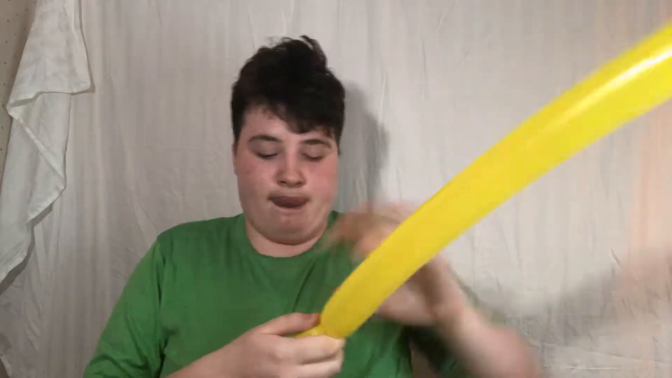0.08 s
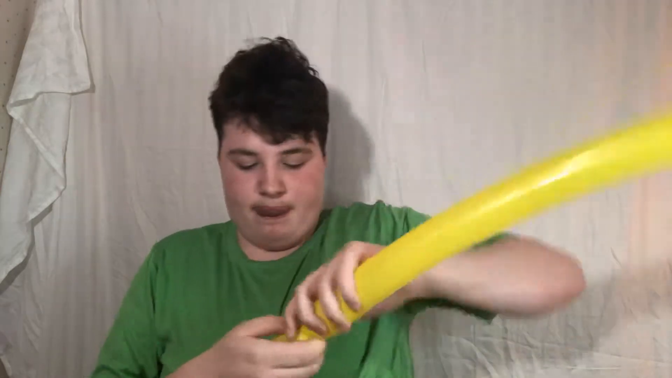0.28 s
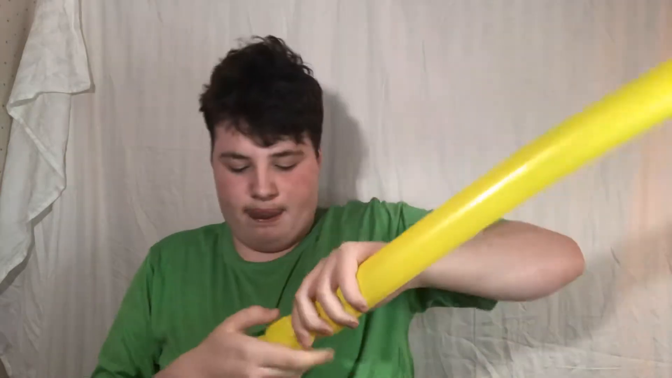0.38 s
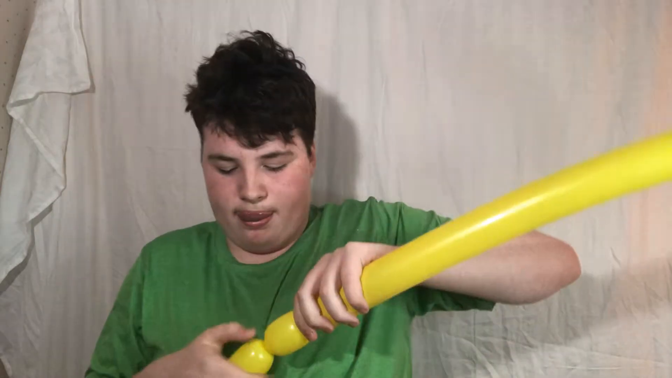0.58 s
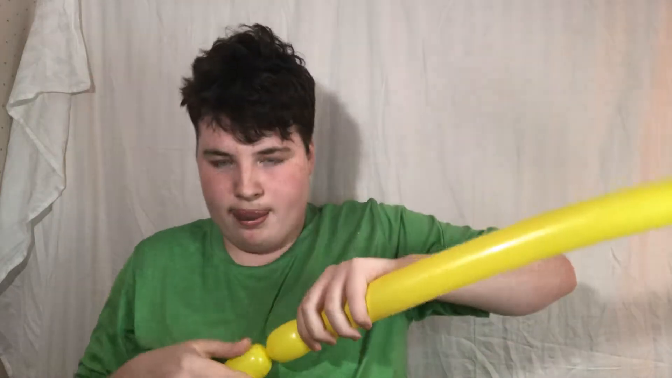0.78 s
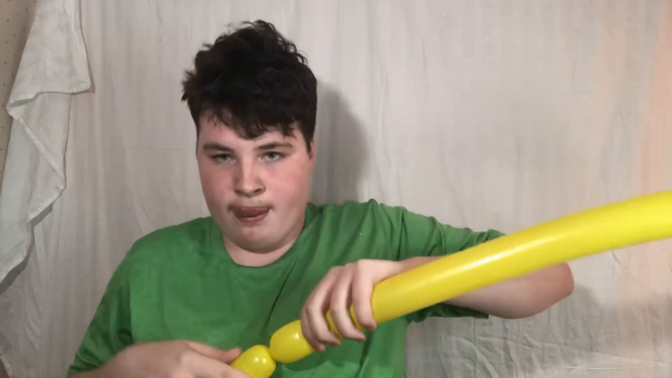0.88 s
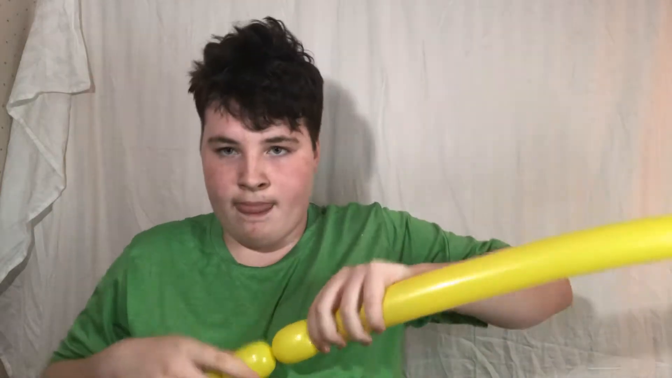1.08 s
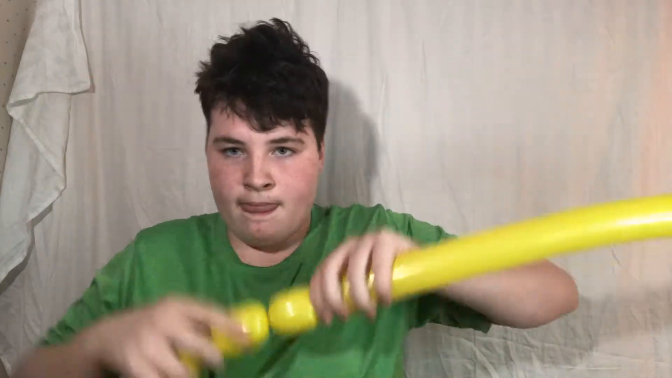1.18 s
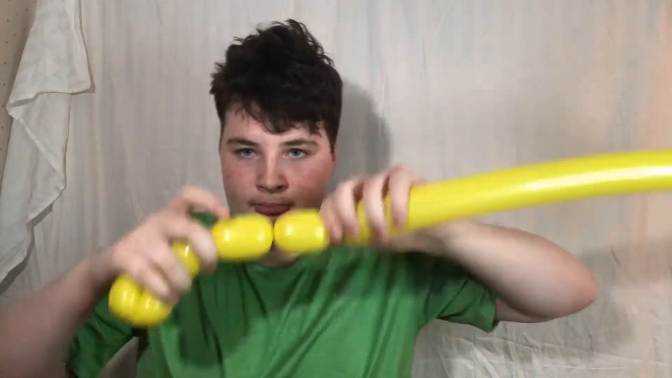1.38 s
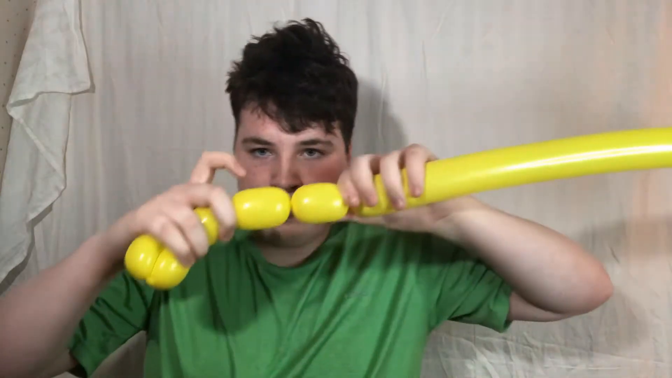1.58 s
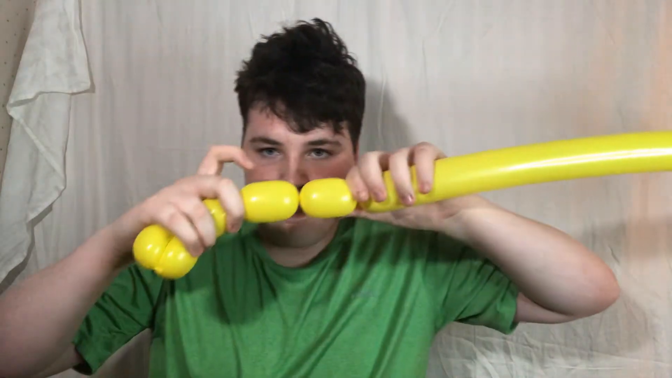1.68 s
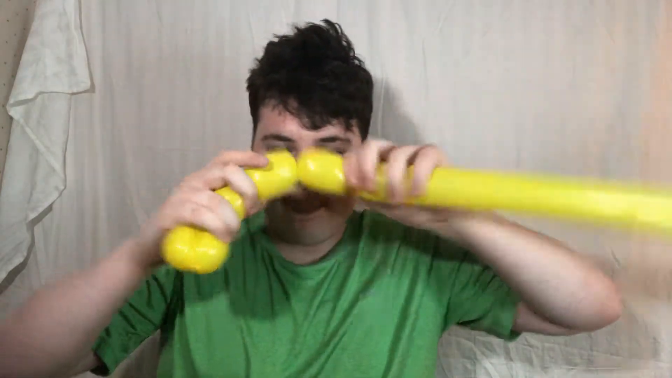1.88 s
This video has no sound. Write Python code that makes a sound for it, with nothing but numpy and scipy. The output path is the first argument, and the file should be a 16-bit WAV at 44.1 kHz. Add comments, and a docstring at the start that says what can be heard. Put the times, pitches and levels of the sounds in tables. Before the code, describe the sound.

Balloon squeaks from hands twisting rubber: crackly slips and a quick chirping squeak first, then a grating creak speeding into a hard squawk, finally near quiet with a few light snaps, close and indoors.

```python
"""A long latex balloon is twisted by hand in a small room, close to the microphone.
Its rubber sticks and slips: each slip is a tick whose bass arrives late through the skin.
Trains of slips make a rising squeak, a slow creak and a hard twist that hands over to a squawk.
Ringing modes make the snaps, gliding tones the skidding fingers, random grains the dry rubbing.
Soft thuds, a brief room answer and a steady hush, all shaped noise, lie around it."""
import sys
import numpy as np
from scipy import signal
from scipy.fft import rfft, irfft, next_fast_len
from scipy.io import wavfile
from scipy.ndimage import uniform_filter1d

SR = 44100
rng = np.random.default_rng(int(sys.argv[2]) if len(sys.argv) > 2 else 0)


def pcm_store(signal):
    """Save signal as 16-bit PCM."""
    levels = np.round(np.clip(np.atleast_2d(signal), -1, 1) * 32767)
    wavfile.write(sys.argv[1], SR, levels.astype(np.int16).T)


N = 83790
T = np.arange(N) / SR


def amp(db):
    """Decibels to gain."""
    return 10 ** (np.asarray(db) / 20)


def unit(x):
    """Scale to rms 1."""
    return x / np.sqrt(np.mean(x ** 2) + 1e-20)


def along(points, hz):
    """Read (f/Hz, value) points on a log frequency axis."""
    f, v = np.transpose(points)
    return np.interp(np.log(hz + 1), np.log(f + 1), v)


def filtered(x, response):
    """Multiply the spectrum of x by a response of frequency."""
    m = next_fast_len(len(x) + SR // 2)
    return irfft(rfft(x, m) * response(np.fft.rfftfreq(m, 1 / SR)), m)[:len(x)]


def coloured_noise(colour):
    """White noise shaped by a colour table, at rms 1."""
    return unit(filtered(rng.standard_normal(N), lambda hz: amp(along(colour, hz))))


def add(out, s, x):
    """Mix x into out from time s."""
    i = max(0, round(s * SR))
    out[i:i + len(x)] += x[:max(0, len(out) - i)]


def burst(t60, size=4096):
    """Dying noise of energy 1."""
    x = rng.standard_normal(size) * amp(-60 * np.arange(size) / SR / t60)
    return x / np.linalg.norm(x)


BASS_HZ, TREBLE_HZ = 950, 4480  # corners of the bass and treble shelves
LAG_S, LAG_POWER = 0.001341, 1.372  # delay of 1 kHz through the skin; how fast it grows downwards
SCATTER_DB, SCATTER_T60 = -3.5, 0.012  # waves running round the balloon: level, decay in s
EVEN_HZ = 600  # width over which the spectrum is evened out before colouring


def skin(colour, bass_db=0, treble_db=0, release=(1,), scatter_db=SCATTER_DB, size=4096):
    """The balloon's answer to one release: a falling chirp and its scatter, in the given colour."""
    hz = np.fft.rfftfreq(size, 1 / SR)
    scattered = rfft(release, size) * (1 + amp(scatter_db) * rfft(burst(SCATTER_T60)))
    power = uniform_filter1d(np.abs(scattered) ** 2, size=round(EVEN_HZ * size / SR))
    broad = np.sqrt(np.abs(power))
    bass_shelf = bass_db / (1 + (hz / BASS_HZ) ** 4)
    treble_shelf = treble_db * (1 - 1 / (1 + (hz / TREBLE_HZ) ** 4))
    wanted = unit(amp(along(colour, hz))) * amp(bass_shelf + treble_shelf)
    # folding the cepstrum gives a minimum-phase filter: its energy comes early
    cepstrum = irfft(np.log(wanted / broad))
    cepstrum[1:size // 2] *= 2
    cepstrum[size // 2 + 1:] = 0
    lag = LAG_S * (1000 / np.maximum(hz, 300)) ** LAG_POWER  # no longer below 300 Hz
    phase = 2 * np.pi * np.cumsum(lag) * SR / size
    return irfft(scattered * np.exp(rfft(cepstrum) - 1j * phase))


# colour of the room's steady noise: f/Hz, level/dB
HUSH_COLOUR = [(25, -31), (45, -8.5), (111, -15.5), (190, -2), (240, -3.5), (360, -1), (470, -7),
               (700, -12), (1000, -11.5), (2000, -21.5), (5000, -34), (9000, -51), (16000, -79)]
HUSH_DB = -51.5


def hush():
    """The room's steady noise, strongest in the low mids."""
    return amp(HUSH_DB) * coloured_noise(HUSH_COLOUR)


# swells of dry skin rubbing on latex: t/s, level/dB
RUB_LEVEL = [(0, -47.5), (.052, -46.5), (.060, -34.5), (.070, -47), (.080, -56), (.098, -46), (.114, -38.5),
             (.135, -49.5), (.21, -44), (.25, -34), (.41, -44), (.475, -36), (.53, -43), (.57, -43),
             (.72, -47), (.95, -39), (1.06, -52), (1.15, -64.5), (1.27, -61.5), (1.325, -53), (1.36, -75),
             (1.39, -68.5), (1.45, -50), (1.52, -54), (1.59, -71.5), (1.645, -59), (1.71, -72.5),
             (1.9, -67.5)]
# colour of the rubbing: f/Hz, level/dB
RUB_COLOUR = [(150, -16), (500, 8.5), (1200, 0.5), (3500, -3), (7000, -4.5), (11000, -13.5), (16000, -13)]
GRAINS_PER_S, GRAIN_SPREAD_DB = 1500, 5


def rubbing():
    """Tiny random slips under the sliding hands, heard through the skin."""
    falls = rng.random(N) < GRAINS_PER_S / SR
    sizes = amp(GRAIN_SPREAD_DB * rng.standard_normal(N))
    grains = falls * rng.choice([-1, 1], N) * sizes
    rub = signal.fftconvolve(grains, skin(RUB_COLOUR))[:N]
    return unit(rub) * amp(np.interp(T, *np.transpose(RUB_LEVEL)))


# decay of the room's tail: f/Hz, T60/s
ROOM_T60 = [(200, .5), (800, 0.47), (3000, 0.44), (8000, 0.1), (15000, 0.45)]
# colour of the whole room answer: f/Hz, level/dB
ROOM_COLOUR = [(150, -9.5), (400, -2.5), (1500, 1), (5000, -0.5), (15000, -4)]
ROOM_DB, WALLS_DB = -10.5, -8.5  # tail and near walls, before the room's colour
WALL_S, WALLS_T60 = .004, 0.089  # delay of both; decay of the near walls in s


def room(x):
    """Near walls give a short dense answer over a longer tail that dies fastest around 8 kHz."""
    hz, t, z = signal.stft(rng.standard_normal(SR // 2), SR, nperseg=256)
    decay = amp(-60 * t / along(ROOM_T60, hz)[:, None])
    tail = signal.istft(z * decay, SR, nperseg=256)[1]
    answer = np.zeros(SR)
    add(answer, WALL_S, amp(ROOM_DB) * tail / np.linalg.norm(tail))
    add(answer, WALL_S, amp(WALLS_DB) * burst(WALLS_T60))
    return filtered(signal.fftconvolve(x, answer)[:N], lambda hz: amp(along(ROOM_COLOUR, hz)))


# single slips: t/s, level/dB before the common gain, bass shelf/dB, treble shelf/dB
SLIPS = [(0.0713, -22.5, -43, 9), (0.1085, -23, -28, 9.5), (0.153, -31.5, -5, 4), (0.1839, -29.5, 2, 1),
         (.2200, -23, 4, 21), (.2280, -11, -7.5, 3), (0.2368, -24.5, 17, 19.5), (0.242, -21, -10, 5),
         (0.3196, -26.5, 14, -16), (0.334, -21, 10, 8.5), (.3637, -33, -1, 13), (.3665, -14.5, -8, 8.5),
         (0.3748, -29, 5, 4), (0.4375, -20, 7, 5), (0.4395, -16.5, -8, -13), (0.4491, -17, 0, 4.5),
         (0.459, -9.5, -21, -3), (.4600, -23.5, -8, 7.5), (0.4689, -20, -6, -4), (0.4975, -22, -1, 1),
         (0.5298, -29.5, 4, 11.5), (0.5947, -11, -4, 4.5), (.6110, -22, -5.5, 4), (0.6186, -8, -13, -11),
         (.7200, -25.5, 5, 3), (0.758, -24, 3, -10), (.7652, -30.5, 15, 5.5), (0.773, -28.5, 13, -10),
         (.7843, -20.5, 6, 3), (.7960, -17, 11.5, 5.5), (0.8034, -16.5, -1, -1), (0.8103, -14, -1, -5.5),
         (0.8166, -14.5, -3, 0), (.9262, -7, -3.5, -8), (.934, -20, 8, -20.5), (.942, -25.5, 6, -1),
         (.952, -17.5, 2.5, -1.5), (1.0375, -24, 5.5, -14), (1.0497, -30, -10, -9.5), (1.056, -29, -15, -6),
         (1.09, -31, -3, -0.5), (1.118, -30, -22, 0.5), (1.2368, -28.5, -10, 3.5), (1.2402, -25, -12, 2.5),
         (1.2444, -24, -6, -2), (1.4160, -36, -5, 1), (1.4301, -36.5, -25, 17.5), (1.4651, -33.5, 1, -4),
         (1.4719, -19, -4, -3), (1.4874, -44.5, -10, 22.5), (1.5144, -41, -7, 8), (1.5577, -33, -13, -5),
         (1.631, -40, 3, 14), (1.6397, -33, -8, -3), (1.6578, -35.5, -2.5, 10), (1.8862, -40, -1, 6.5)]
# colour of a slip before its shelves: f/Hz, level/dB
SLIP_COLOUR = [(100, -19.5), (250, -6.5), (600, 6), (1500, 8), (3000, 1.5), (5000, -0.5), (8000, -6.5),
               (11000, -11.5), (16000, -23)]
TEAR_S = .0022  # length of the tear around a tick


def slips(gain_db=13, tear_db=2, tail_db=-11, tail_t60=0.015):
    """Single releases of the rubber: a tick inside a short tear, with a quiet noisy tail."""
    out = np.zeros(N)
    window = np.sin(np.pi * np.minimum(T[:4096] / TEAR_S, 1))
    for s, db, bass_db, treble_db in SLIPS:
        tear = window * rng.standard_normal(len(window))
        release = amp(tear_db) * tear / np.linalg.norm(tear) + amp(tail_db) * burst(tail_t60)
        release[round(TEAR_S / 2 * SR)] += 1  # the tick, mid-tear
        tick = skin(SLIP_COLOUR, bass_db, treble_db, release)
        add(out, s - TEAR_S / 2, amp(db + gain_db) * tick)
    return out


# chirps and moans under skidding fingers:
# t/s, length/s, start f/Hz, end f/Hz, level/dB, step from each harmonic to the next/dB
SKIDS = [(0.1507, 0.011, 684, 600, -38.5, -14), (0.223, 0.0041, 697, 590, -30, -20),
         (0.2292, 0.003, 670, 570, -25, -13), (0.238, 0.0071, 720, 573, -29.5, -26),
         (0.304, .014, 1291, 1535, -24, -3.5), (0.321, 0.0073, 1310, 1190, -26.5, -24),
         (0.35, 0.0063, 1010, 870, -21.5, -15), (0.3562, 0.0069, 945, 1160, -24.5, -7.5),
         (0.428, 0.015, 1070, 1180, -37, -23), (0.4403, 0.0074, 648, 647, -23, -21.5),
         (0.4532, .005, 800, 700, -32, -12), (.4483, .0018, 3200, 2900, -20, -14),
         (.4574, .003, 3400, 3000, -19.5, -13), (.4683, .0016, 3250, 2950, -20, -14),
         (0.483, 0.0876, 423.6, 372.6, -41.5, -23), (0.591, 0.01, 1343, 1320, -24, -4),
         (0.617, 0.0017, 2460, 2140, -16.5, -25), (1.244, 0.0022, 2060, 1940, -36.5, -8),
         (1.249, 0.051, 331, 320, -44.5, -22)]
SKID_JITTER = 0.019  # share by which the pitch wavers


def skids(count=5):
    """A finger skids and the rubber gives a short gliding tone of a few harmonics."""
    out = np.zeros(N)
    for s, length, start_hz, end_hz, db, step_db in SKIDS:
        u = np.linspace(0, 1, max(8, round(length * SR)))
        waver = np.interp(u, np.linspace(0, 1, 10), rng.standard_normal(10))
        pitch = (start_hz + (end_hz - start_hz) * u) * (1 + SKID_JITTER * waver)
        phase = 2 * np.pi * np.cumsum(pitch) / SR
        tone = sum(amp(step_db * k) * np.sin((k + 1) * phase) for k in range(count))
        add(out, s, amp(db) * unit(tone) * signal.windows.tukey(len(u), .5))
    return out


GRIP_S = .022  # time in which the shifting grip changes the scatter


def through_skin(x, colour, scatter_db, start, end):
    """Pass x through the skin while the grip shifts: one scatter fades into the next."""
    out = np.zeros(N)
    for s in np.arange(start, end + 2 * GRIP_S, GRIP_S):
        fade = np.maximum(1 - np.abs(T - s) / GRIP_S, 0)
        out += signal.oaconvolve(x * fade, skin(colour, scatter_db=scatter_db))[:N]
    return out


def run_of_slips(rows, colour, scatter_db, jitter, uneven_db, rough, rough_t60):
    """Stick-slip at a changing rate; each release brings a puff of friction noise (rough: its share)."""
    s, rate, db = np.transpose(rows)
    turns = np.cumsum(np.interp(T, s, rate, left=0, right=0)) / SR
    chance = rng.standard_normal((200, 2))[:int(turns[-1]) + 1]
    # one release at each whole turn
    times = np.interp(np.arange(len(chance)) + 1e-6, turns, T)
    rates = np.interp(times, s, rate)
    times = times + jitter * chance[:, 0] / rates
    # the root keeps the level the same at any rate
    sizes = amp(np.interp(times, s, db) + uneven_db * chance[:, 1]) * np.sqrt(SR / rates)
    pulses = np.bincount(np.clip(np.round(times * SR).astype(int), 0, N - 1), sizes, N)
    puff = amp(-60 * T[:SR // 20] / rough_t60)
    puffs = signal.fftconvolve(pulses, puff / np.linalg.norm(puff))[:N]
    hiss = puffs * rng.standard_normal(N)
    friction = np.sqrt(1 - rough) * pulses + np.sqrt(rough) * hiss
    return through_skin(friction, colour, scatter_db, s[0], s[-1])


BRIGHT_HZ = 5490  # pressing harder lifts the treble above this corner
BRIGHT_PER_DB, BRIGHT_FROM_DB = 2, -19  # dB of treble per dB of level; level of no change


def brightened(x, rows):
    """The treble rises and falls with the force of the twist, read from its level."""
    s, _, db = np.transpose(rows)
    low = filtered(x, lambda hz: 1 / (1 + (hz / BRIGHT_HZ) ** 2))
    return low + (x - low) * amp(BRIGHT_PER_DB * (np.interp(T, s, db) - BRIGHT_FROM_DB))


# runs of slips: t/s, slips per second/Hz, level/dB before the run's gain
FIRST_TWIST = [(.250, 279, -44), (.263, 330, -33), (.269, 500, -24), (.284, 540, -23), (.297, 530, -25),
               (.302, 750, -24), (.307, 1340, -25), (.315, 1530, -29), (.319, 1340, -28), (.323, 450, -32),
               (.328, 450, -26), (.342, 500, -32), (.358, 520, -29), (.372, 470, -30), (.385, 400, -43.5)]
CREAK = [(.622, 130.2, -33.5), (.634, 125.3, -27), (.650, 115.1, -32), (.670, 164.2, -26.5),
         (.690, 243.7, -31), (.700, 289.2, -29), (.712, 201, -41), (.745, 138, -38)]
HARD_TWIST = [(0.8232, 214.1, -22), (0.836, 312.3, -19.5), (0.844, 289, -18.5), (.855, 200, -19.5),
              (.866, 250.1, -18.5), (0.876, 318, -15.5), (0.886, 420.3, -15.5), (0.89, 580, -21.5)]
SQUAWK = [(.888, 662, -22), (.894, 717, -18.5), (.903, 756.6, -16), (.912, 775.4, -18), (.918, 748, -20),
          (.927, 676, -28.5)]
# colour of each run: f/Hz, level/dB
FIRST_COLOUR = [(150, -22), (600, -15), (1400, 0.5), (2100, 4.5), (3000, -3), (4500, -7.5), (7000, -5),
                (9000, -15.5), (16000, -18.5)]
CREAK_COLOUR = [(150, -18), (300, -2), (520, 2), (900, 2.5), (1500, -2), (2500, 0), (3200, -8.5),
                (5200, -8), (6200, -15), (7500, -11), (10000, -20.5), (16000, -29)]
HARD_COLOUR = [(150, -25.5), (350, -6.5), (520, 1), (720, 1), (950, 3.5), (1350, 6), (2000, 2), (2700, 2.5),
               (3600, -6.5), (4400, 2.5), (5800, -2.5), (6500, -14.5), (7600, 0), (8500, -7.5),
               (9300, -12.5), (11500, -14.5), (16000, -24.5)]
SQUAWK_COLOUR = [(300, -19), (750, 2), (1500, -4), (2300, -7.5), (3000, -10.5), (3700, -7.5), (4500, -6),
                 (5500, -10.5), (6600, -15), (7500, -7), (8500, -6), (9400, -23), (11000, -12),
                 (16000, -43.5)]


def twists(first_db=-1.0, creak_db=-2.0, hard_db=-1, squawk_db=0.0, loose_scatter_db=-2, taut_scatter_db=-7):
    """A rising squeak, a slow creak, then a hard twist that speeds up and hands over to a squawk."""
    first = run_of_slips(FIRST_TWIST, FIRST_COLOUR, taut_scatter_db,
                         jitter=.02, uneven_db=1.6, rough=.05, rough_t60=.005)
    creak = run_of_slips(CREAK, CREAK_COLOUR, loose_scatter_db,
                         jitter=.08, uneven_db=2, rough=.22, rough_t60=.006)
    hard = run_of_slips(HARD_TWIST, HARD_COLOUR, loose_scatter_db,
                        jitter=.03, uneven_db=.9, rough=.22, rough_t60=.006)
    squawk = run_of_slips(SQUAWK, SQUAWK_COLOUR, taut_scatter_db,
                          jitter=.012, uneven_db=.7, rough=.06, rough_t60=.003)
    hard = brightened(hard, HARD_TWIST)
    return amp(first_db) * first + amp(creak_db) * creak + amp(hard_db) * hard + amp(squawk_db) * squawk


# resonances of the taut rubber at four grips: f/Hz, level/dB relative to the snap
NECK = [(2100, -7), (3280, 2), (3850, -4), (4600, 1), (5150, -11.5), (6600, -14)]
PINCH = [(950, -8.5), (1330, 0), (2540, 1), (4080, -8.5), (5200, -9), (8200, -24.5)]
BUBBLE = [(565, 3), (870, 0), (1110, -2.5), (2130, -15), (4040, -1), (5140, -0.5), (6150, -8)]
KNOT = [(1560, 2), (2780, -4), (4100, -7), (6900, -20)]
# snaps that ring the rubber: t/s, level/dB, swell/s, resonances
SNAPS = [(.3648, -19, .0018, NECK), (0.594, -13, 0.0027, PINCH), (1.2368, -34, 0.0033, BUBBLE),
         (1.4306, -28, 0.0011, KNOT), (1.4715, -23.5, 0.00071, KNOT)]
SNAP_SAG_PER_S = 11  # share of the pitch lost per second
SNAP_WAVER, SNAP_WAVERS_PER_S = .038, 900  # share of the pitch; new random targets per second


def snaps():
    """The taut rubber jumps free; its resonances swell, waver, sag as it slackens, and die fast."""
    out = np.zeros(N)
    t = T[:SR // 20]
    for s, db, swell_s, modes in SNAPS:
        swell = (t / swell_s * np.exp(1 - t / swell_s)) ** 2  # peaks at 1 after swell_s
        for hz, level in modes:
            waver = np.interp(t * SNAP_WAVERS_PER_S, np.arange(50), rng.standard_normal(50))
            pitch = hz * (1 - SNAP_SAG_PER_S * (t - swell_s) + SNAP_WAVER * waver)
            ring = np.sin(2 * np.pi * (np.cumsum(pitch) / SR + rng.random()))
            add(out, s, amp(db + level) * ring * swell)
    return out


# soft bumps of a hand on the balloon: t/s, level/dB before rise and decay
BUMPS = [(0.371, -34), (1.24, -46)]
# colour of a bump: f/Hz, level/dB
BUMP_COLOUR = [(30, -27), (70, -10), (140, 0), (220, 17.5), (330, -12.5), (600, -18), (2000, -63)]
BUMP_RISE_S, BUMP_T60 = 0.0113, 0.13  # both in s


def bumps():
    """A hand takes a new grip and the air inside thuds softly: low noise with a quick rise and decay."""
    level = np.zeros(N)
    thud = np.minimum(T / BUMP_RISE_S, 1) * amp(-60 * T / BUMP_T60)
    for s, db in BUMPS:
        add(level, s, amp(db) * thud)
    return level * coloured_noise(BUMP_COLOUR)


def scene():
    """The balloon, its room and the room's steady noise, on one channel."""
    balloon = rubbing() + slips() + skids() + twists() + snaps() + bumps()
    return (balloon + room(balloon) + hush())[None]


TOP_HZ = 15950  # band limit


def record(dry, low_hz=38):
    """The microphone drops the deep bass; nothing is kept above the band limit."""
    def response(hz):
        """Low cut and sharp band limit."""
        return (hz < TOP_HZ) * (1 - 1 / (1 + (hz / low_hz) ** 4))
    return np.array([filtered(x, response) for x in dry])


dry = scene()
out = record(dry)
pcm_store(out)
```